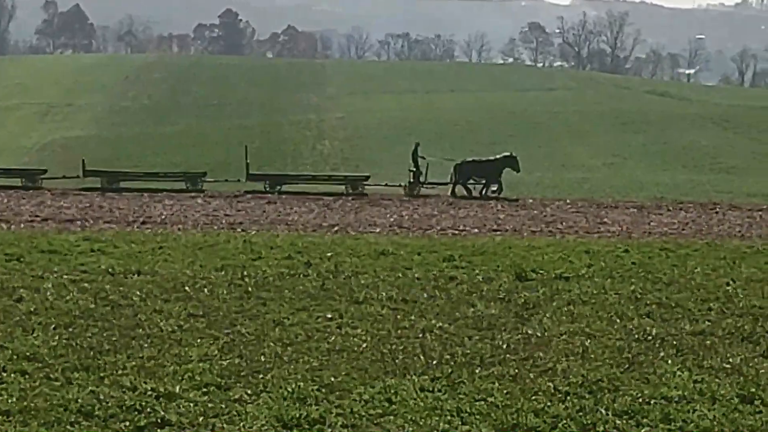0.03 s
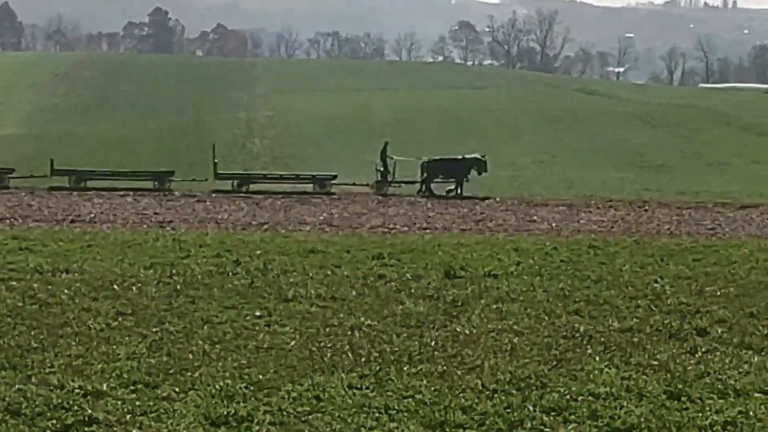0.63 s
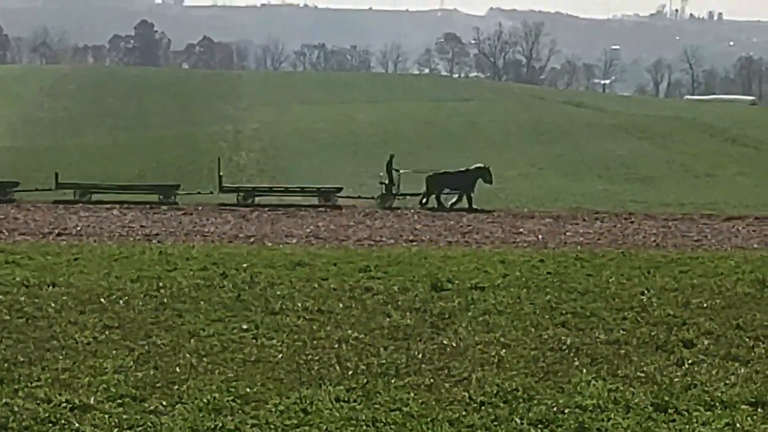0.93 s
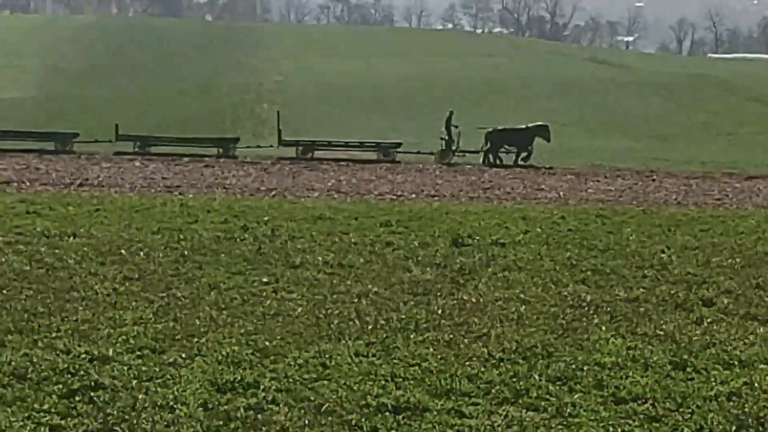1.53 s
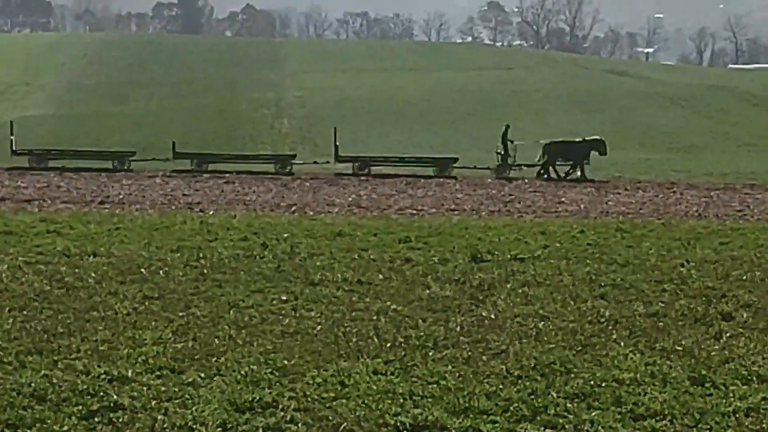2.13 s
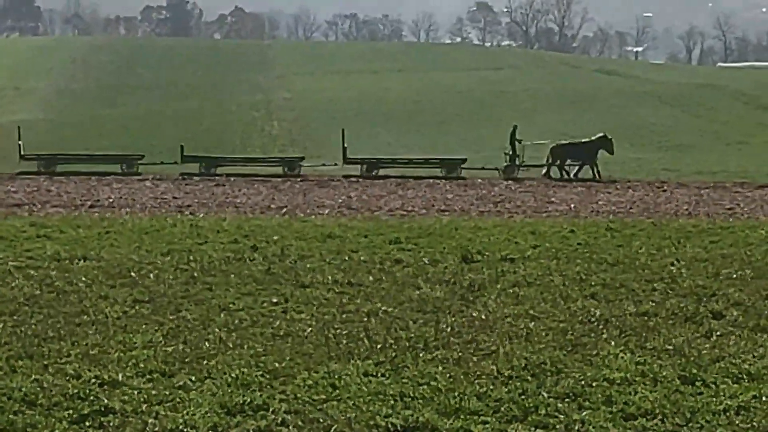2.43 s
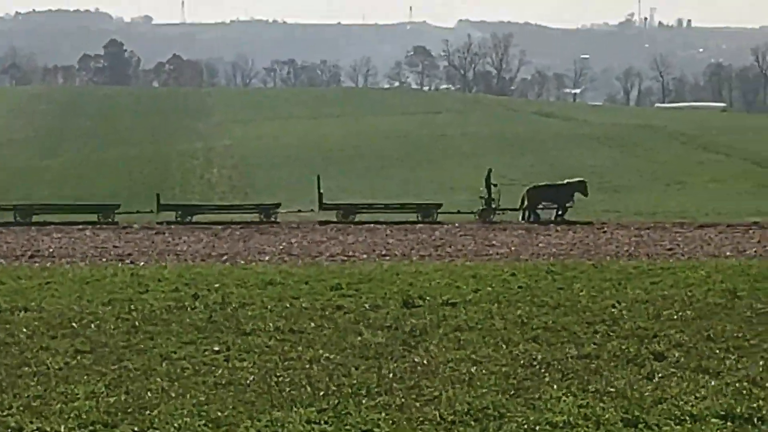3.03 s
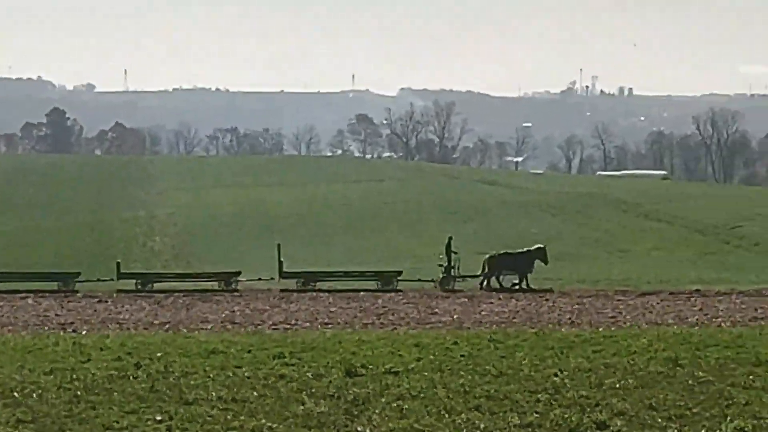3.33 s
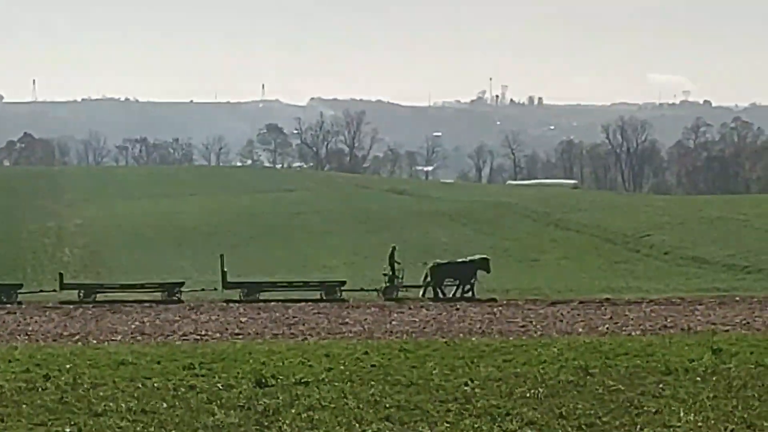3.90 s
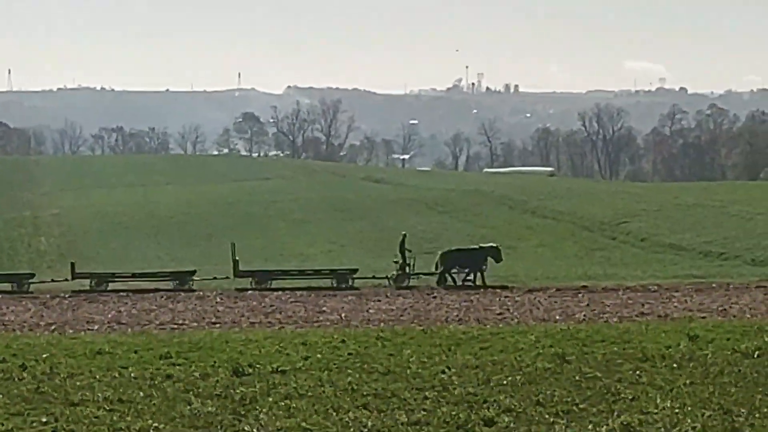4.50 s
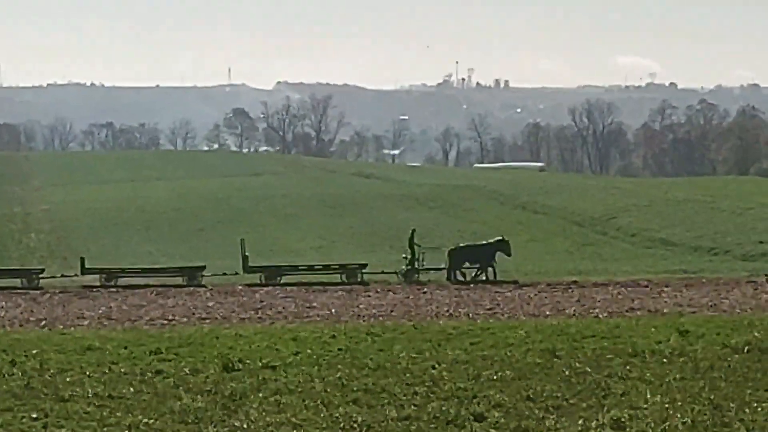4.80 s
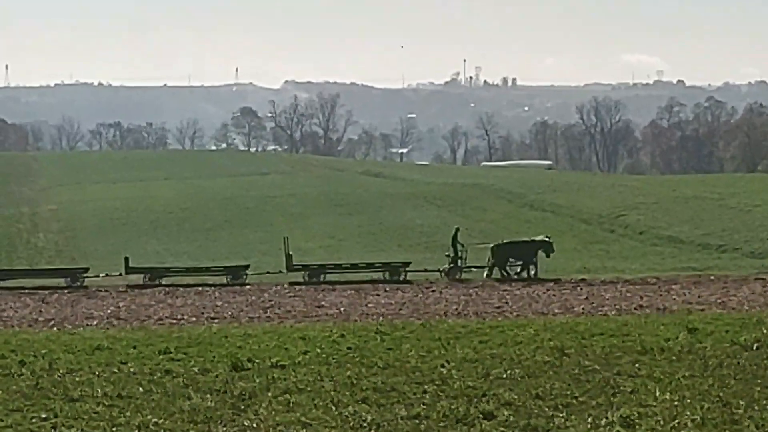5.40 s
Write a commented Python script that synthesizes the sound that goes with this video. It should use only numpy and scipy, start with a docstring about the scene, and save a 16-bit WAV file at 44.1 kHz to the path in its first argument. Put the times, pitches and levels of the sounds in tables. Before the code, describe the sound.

Empty flat wagons roll over dirt some way off in an open field. Their low, hollow rumble and the clatter of loose boards run for the whole five and a half seconds, swelling slightly at ruts around 1.9, 2.7, 3.8 and 5.3 seconds. Hitches and chains click and jingle irregularly above it, more sparsely after 3 seconds. Wheels grind and crunch softly in dry soil, most from 1.4 to 3.1 seconds, then fade away. Tiny stone snaps and short bursts of fine, close rustling dot the first three seconds, and a rim scrapes briefly at the start and near 1.3, 1.7 and 2.1 seconds. Wind buffets the microphone with low thumps in the first half second, mostly on the left, then on the right at 1 and 3.3 seconds. Faint, thin, falling bird whistles come between 3.5 and 5.1 seconds over a quiet outdoor hush.

```python
"""An open field: horses draw a train of empty flat wagons along a dirt strip some way off.
Ruts shake the wagons, so their beds rumble and loose boards clatter. The wheels grind through dry soil
until the ground softens; stones snap, hitches and chains rattle, and a rim scrapes now and then.
Small birds whistle far off. Close by, a fine, dry rustle comes in short bursts,
and a light breeze puffs at the two microphone openings."""
import sys
import numpy as np
from scipy import signal
from scipy.fft import rfft, irfft
from scipy.io import wavfile
from scipy.ndimage import uniform_filter1d

SR = 44100
rng = np.random.default_rng(int(sys.argv[2]) if len(sys.argv) > 2 else 0)


def master(y):
    """Save y as 16-bit WAV."""
    cut = np.clip(np.atleast_2d(y).T, -1, 1)
    pcm = np.round(cut * 32767)  # scale
    wavfile.write(sys.argv[1], SR, pcm.astype(np.int16))


N = 244755
TIME, FREQS = np.arange(N) / SR, np.fft.rfftfreq(N, 1 / SR)
LEFT, RIGHT = 0, 1

# wheels in soil that softens after three seconds: t/s, grinding/dB, crunch/dB
SOIL_LEVELS = [(0, -55.5, -66), (.28, -57.5, -65), (.37, -64.5, -74.5), (.8, -65.5, -63.5),
               (.98, -67.5, -69.5), (1.2, -64.5, -60), (1.38, -56.5, -60), (2.0, -56.5, -65),
               (2.2, -55, -62), (2.48, -55, -64), (2.93, -52, -61), (3.13, -55.5, -68.5),
               (3.26, -65, -71.5), (3.65, -68, -74.5), (5.55, -73, -78)]
# the tone of a grinding rim: f/Hz, level/dB
GRIND_SPECTRUM = [(600, -40.5), (900, -22.5), (1150, -3.5), (1300, 3.5), (1520, 3), (1690, -5), (1830, 3),
                  (2000, 3), (2170, 2), (2430, -3.5), (2700, -5), (2920, -6), (3200, -13.5), (5000, -29.5)]


def wagons(frame_hz=342, boards_follow=0.45, boards_heave=0.65):
    """Ruts shake the wheels and axles, make beds and frames boom, and knock the loose boards."""
    # how hard the track shakes the wagons: t/s, axle rumble/dB, bed boom/dB
    shaking = [(0, -41, -50), (.7, -43, -46.5), (1.25, -49.5, -46.5), (1.8, -50.5, -46), (2.02, -52, -50.5),
               (2.2, -49, -44), (2.55, -47.5, -42.5), (3.4, -45.5, -40.5), (3.67, -48, -44.5),
               (3.9, -46, -40), (4.55, -49, -42), (4.95, -44, -42), (5.55, -45.5, -47.5)]
    # ringing that shifts as they pass: t/s, bed/Hz, plank/Hz, frames over boards/dB, boards/dB
    ringing = [(0, 292.6, 526, -7, -54.5), (1.2, 283, 517, -6, -54.5), (2.2, 268.6, 519, -5, -56.5),
               (3.1, 261, 545, -5, -55.5), (3.8, 244, 583, -0.5, -53.5), (5.55, 246.4, 590, 6, -53.5)]
    # ruts that heave the whole train: t/s, boost/dB
    ruts = [(1.35, 1), (1.68, 3), (1.869, 5), (2.65, 3.5), (3.83, 3), (5.32, 2.5)]
    # the tones of axles, jolts and boards: f/Hz, level/dB
    rumble_spectrum = [(20, -34.5), (40, -26), (60, -13), (90, -3), (125, 2), (152, 1), (180, -5),
                       (215, -9.5), (300, -6.5), (390, -18), (460, -19.5), (800, -69)]
    jolt_spectrum = [(80, -34), (200, -0.5), (680, -5.5), (800, -15.5), (1100, -46.5)]
    board_spectrum = [(200, -23.5), (330, 2.5), (400, 6), (470, 1.5), (540, -0.5), (620, -3), (700, -30.5),
                      (790, -36), (1000, -37.5), (2000, -48.5)]
    rumble_db, boom_db = follow(shaking)
    bed_hz, plank_hz, frame_db, boards_db = follow(ringing)
    heave_db = sum(db * np.exp(-((TIME - s) / 0.055) ** 2) for s, db in ruts)
    clatter_db = boards_db + boards_follow * (boom_db - boom_db.mean()) + boards_heave * heave_db
    rumble = in_stereo(grains(per_s=150, spread_db=2.3, share=0.34), rumble_spectrum)
    bumps = patchy(grains(per_s=250, spread_db=3, share=0.38), depth_db=2.5, size=4096)
    jolts = in_stereo(bumps, jolt_spectrum)
    boom = resonate(jolts, bed_hz, width_hz=82)
    frames = gain_of(frame_db) * resonate(jolts, frame_hz, width_hz=54)
    planks = gain_of(-3) * resonate(jolts, plank_hz, width_hz=167)
    knocks = patchy(grains(per_s=450, spread_db=0, share=0.64), depth_db=4.5, size=4096)
    boards = glide(in_stereo(knocks, board_spectrum), rise_per_s=0.03)
    body = gain_of(rumble_db + 2) * rumble + gain_of(boom_db - 1) * boom
    return gain_of(heave_db) * body + gain_of(clatter_db) * (boards + planks + frames)


def wheels_and_rustle(rustle_db=-69.5, rustle_follow=1.25, clump_db=1.08, crackle_db=1.4):
    """Rims grind and crunch dry soil; a fine, dry rustle close to the microphone comes in short bursts."""
    # short bursts of crunch and rustle: peak t/s, rise/s, crunch/dB, rustle/dB
    bursts = [(.05, 0.037, -59, -73), (.175, 0.024, -65, -66), (.355, 0.087, -65, -68),
              (.545, 0.025, -62, -69), (.69, 0.057, -58.5, -72), (.77, 0.039, -83, -67),
              (.95, 0.058, -98, -69), (1.24, 0.14, -74, -68.5), (1.47, 0.043, -59.5, -68),
              (1.53, 0.064, -79, -66), (1.623, 0.024, -54, -79), (1.847, 0.044, -57.5, -67),
              (2.06, 0.033, -57.5, -80), (2.245, 0.033, -56, -67), (2.37, 0.056, -54.5, -79),
              (2.475, 0.044, -62, -68)]
    # the tones of the crunching grit and the close rustle: f/Hz, level/dB
    grit_spectrum = [(1500, -1), (3000, 5), (3600, 2), (4200, 3), (4800, -3.5), (5500, 0), (6400, -4.5),
                     (7100, -5.5), (8600, -5), (10000, -18.5), (12000, -20), (16000, -45)]
    rustle_spectrum = [(4000, -19.5), (8000, -0.5), (10000, 1.5), (12000, -3), (14000, -7), (16000, -10)]
    grind_db, crunch_db = follow(SOIL_LEVELS)
    bite_db = grind_db + 0.71 * (crunch_db - grind_db)  # the rustle's level mostly follows the crunch
    crunch_gain = gain_of(crunch_db)
    rustle_gain = gain_of(rustle_db + rustle_follow * (bite_db - bite_db.max()))
    for s, rise_s, burst_crunch_db, burst_rustle_db in bursts:
        burst = swell(s, rise_s)
        crunch_gain = np.hypot(crunch_gain, gain_of(burst_crunch_db) * burst)
        rustle_gain = np.hypot(rustle_gain, gain_of(burst_rustle_db) * burst)
    coarse = patchy(grains(per_s=1500, spread_db=2, share=0.34), depth_db=2, size=1024)
    medium = patchy(grains(per_s=1500, spread_db=0, share=0.54), depth_db=3)
    fine = patchy(grains(per_s=1700, spread_db=5, share=0.4), depth_db=3.5, size=256)
    grind = gain_of(grind_db) * in_stereo(colour(coarse), GRIND_SPECTRUM)
    grit = crunch_gain * in_stereo(colour(medium), grit_spectrum)
    rustle = rustle_gain * in_stereo(colour(fine), rustle_spectrum)
    rustle *= gain_of(crackle_db * wander(hz=120))
    return (grind + grit + rustle) * gain_of(clump_db * wander(hz=59.6))


def hitches(rise_s=0.0012, pivot_hz=2400, knock_db=-5, knock_s=0.006):
    """Each jerk of a hitch starts with a knock and sets off a short, dying shower of iron clicks."""
    # jerks of the hitches: t/s, level/dB, time to fade by 60 dB/s, treble tilt/dB per octave
    jerks = [(0.016, -52.5, 0.53, -5.5), (0.254, -53.5, 0.45, -5), (.404, -56, 0.97, 4),
             (.55, -58.5, 1, 4.5), (.7, -56, 0.17, -2), (.789, -52.5, 0.58, 5.5), (1.02, -58.5, 0.65, 3.5),
             (1.114, -56.5, 0.15, 4), (1.612, -48.5, 0.37, 3.5), (1.849, -52.5, 0.34, -1),
             (2.113, -54.5, 0.18, 7), (2.168, -55, 0.26, -1), (2.214, -51, 0.25, 1.5),
             (2.337, -52, 0.21, -9), (2.637, -56, 0.14, -3), (2.666, -51.5, 0.21, 0),
             (2.828, -54, 0.088, 7), (2.996, -55, 0.066, -11), (3.113, -60, 0.15, 5),
             (3.349, -63, 0.18, -1), (3.679, -59.5, 0.26, -1), (3.902, -56, 0.25, 4),
             (3.935, -60.5, 0.62, -5.5), (4.16, -65.5, .15, 5), (4.32, -70, 0.83, 7),
             (4.482, -57.5, 0.69, 0), (4.564, -66.5, 0.6, 2.5), (5.05, -59, 0.2, -2.5),
             (5.198, -65, 0.44, 8.5), (5.252, -69, 0.13, 8.5), (5.33, -65.5, 0.13, 3),
             (5.456, -62.5, 0.31, 0.5)]
    # the tone of a hitch: f/Hz, level/dB
    hitch_spectrum = [(700, -16), (1400, -1.5), (1900, -0.5), (2250, 7), (2780, 3), (3080, -11.5),
                      (3600, -4), (4300, -8.5), (6300, -17), (8500, -23.5), (11000, -38.5), (16000, -52)]
    clicks = patchy(grains(per_s=1400, spread_db=9, share=0.2), depth_db=3)
    shower = in_stereo(colour(clicks), hitch_spectrum)
    out = np.zeros((2, N))
    for s, db, t60, tilt_db in jerks:
        burst = shower[:, round(s * SR):][:, :SR // 2]
        t = TIME[:burst.shape[1]]
        octaves = np.log2(np.maximum(np.fft.rfftfreq(len(t), 1 / SR) / pivot_hz, 0.5))
        burst = evened(irfft(rfft(burst) * gain_of(tilt_db * octaves), len(t)))
        fade = decay(t, t60) + gain_of(knock_db) * np.exp(-t / knock_s)
        add(out, s, gain_of(db - 1) * burst * (1 - np.exp(-t / rise_s)) * fade)
    return out


def chains(rise_s=0.002, jingle_count=70, jingle_hz=(3800, 9600), jingle_t60=0.2):
    """A struck link rings with a thin tone and chatters on its neighbour; high links chatter fastest."""
    # single links and harness rings: t/s, f/Hz, level/dB, time to fade by 60 dB/s
    links = [(.02, 2250, -52, .3), (.41, 4110, -66, .3), (.425, 4450, -66, .3), (.46, 2830, -62, .25),
             (.565, 4150, -66, .4), (.575, 6930, -62.5, .15), (.6, 2820, -61, .25), (.68, 6950, -66, .3),
             (.705, 4250, -63, .2), (1.053, 2820, -56, .16), (1.06, 1160, -67.5, .22),
             (1.12, 2650, -61, .3), (1.125, 4950, -69, .25), (1.16, 4440, -65, .25),
             (1.44, 6970, -61.5, .25), (1.472, 2630, -56, .2), (1.613, 2630, -51, .25),
             (1.635, 2790, -56, .17), (1.64, 8790, -65, .2), (1.762, 2020, -54, .16),
             (1.765, 9560, -72, .2), (1.845, 4130, -63, .2), (2.052, 7020, -60.5, .13),
             (2.116, 4870, -63, .14), (2.116, 2580, -56, .16), (2.12, 1880, -54, .22),
             (2.166, 2580, -56, .15), (2.175, 7190, -65, .18), (2.215, 2620, -52, .18),
             (2.22, 1765, -54, .18), (2.245, 4950, -64, .18), (2.39, 8820, -58.5, .18),
             (2.633, 2070, -53, .17), (2.833, 1510, -52, .15), (3.12, 8810, -74, .17),
             (3.683, 2120, -59, .25), (3.905, 2200, -62, .45), (3.96, 8810, -75, .13),
             (3.98, 2120, -63, .35), (4.483, 2230, -56.5, .38), (4.53, 2350, -64, .4),
             (4.565, 1850, -61, .27), (4.61, 2250, -66, .35), (5.053, 2100, -63, .25),
             (5.462, 2400, -64, .2)]
    t, out = TIME[:SR // 3], np.zeros((2, N))
    crunch_db = follow(SOIL_LEVELS)[1]
    jingles = []  # small links jingle at random, louder on rough ground
    for when, pitch in rng.random((jingle_count, 2)):
        hz = np.interp(pitch, [0, 1], jingle_hz)
        jingles.append((when * N / SR, hz, crunch_db[int(when * N)] - 10.5, jingle_t60))
    for s, hz, db, t60 in links + jingles:
        tone = np.sin(2 * np.pi * hz * t + rng.random((2, 1)))
        chatter = resonate(rng.standard_normal((2, len(t))), hz, width_hz=110 + 0.025 * hz)
        ring = tone + np.sqrt(0.5) * chatter  # both equally strong
        add(out, s, gain_of(db) * ring * (1 - np.exp(-t / rise_s)) * decay(t, t60))
    return out


def rims(edge_s=0.038, waver=0.025):
    """A rim rubs on its frame: tiny slips make it ring, and the pitch wavers as the contact shifts."""
    # scrapes of an iron rim: start t/s, length/s, f/Hz, level/dB
    scrapes = [(.01, 0.39, 2240, -58.5), (1.25, 0.28, 2260, -60), (1.69, 0.26, 2190, -58.5),
               (2.09, 0.22, 1750, -60)]
    slips = in_stereo(grains(per_s=830, spread_db=1.5, share=0.54), GRIND_SPECTRUM)
    unsteady = 1 + waver * wander(hz=15)
    out = np.zeros((2, N))
    for s, length, hz, db in scrapes:
        rub = slips[:, round(s * SR):][:, :round(length * SR)]
        t = TIME[:rub.shape[1]]
        ring = resonate(rub, hz * np.interp(s + t, TIME, unsteady), width_hz=330)
        fade = np.clip(np.minimum(t, length - t) / edge_s, 0, 1)
        add(out, s, gain_of(db) * ring * fade)
    return out


def stones(tick_t60=0.014, crumbs_db=-13, crumbs_t60=0.09):
    """A stone cracks with one bright tick, and its crumbs scatter."""
    # small stones snapping under a rim: t/s, level/dB
    snaps = [(.17, -58), (.344, -62), (.548, -63), (.802, -58), (.96, -60), (1.364, -59), (1.844, -56),
             (2.253, -58), (2.398, -59), (2.837, -61)]
    # the tone of a snap: f/Hz, level/dB
    stone_spectrum = [(1500, -12), (4000, -1), (9000, 0), (14000, -3), (16000, -9)]
    t, out = TIME[:SR // 10], np.zeros((2, N))
    splinters = in_stereo(grains(per_s=2200, spread_db=1, share=0.6), stone_spectrum)
    fade = decay(t, tick_t60) + gain_of(crumbs_db) * decay(t, crumbs_t60)
    for s, db in snaps:
        add(out, s, gain_of(db) * fade * splinters[:, round(s * SR):][:, :len(t)])
    return out


def birds(settle=2.2, quaver=0.007, echo_db=-11, echo_t60=0.25):
    """Thin, quavering whistles slide down to their last pitch; the field scatters a faint echo."""
    # bird notes: t/s, length/s, start f/Hz, end f/Hz, peak/dB, left minus right/dB
    notes = [(3.525, .058, 9600, 7550, -65.5, -8), (3.575, .06, 8000, 7600, -74, -4),
             (4.545, .065, 8700, 7250, -75, -6), (4.545, .065, 8100, 6850, -76, -6),
             (4.652, .022, 7400, 7350, -74, -2), (4.757, .018, 5750, 5650, -74, -2),
             (4.818, .027, 4900, 4000, -70, -4), (4.953, .055, 4680, 4500, -67, -1),
             (5.108, .03, 5360, 5280, -68.5, 0)]
    out = np.zeros((2, N))
    unsteady = 1 + quaver * wander(hz=300)
    for s, length, start_hz, end_hz, db, pan_db in notes:
        progress = np.linspace(0, 1, round(length * SR))
        hz = end_hz + (start_hz - end_hz) * (1 - progress) ** settle
        hz *= unsteady[round(s * SR):][:len(hz)]
        note = np.sin(np.pi * progress) * np.sin(2 * np.pi * np.cumsum(hz) / SR)
        add(out, s, gain_of(db + np.array([[0.5], [-0.5]]) * pan_db) * note)
    out[LEFT] = np.roll(out[LEFT], 3)  # the calls reach the left side a moment late
    tail = rng.standard_normal((2, SR // 3)) * decay(TIME[:SR // 3], echo_t60)
    echo = signal.fftconvolve(out, tail / np.linalg.norm(tail[LEFT]), axes=1)[:, :N]
    return out + gain_of(echo_db) * echo


def wind(lumps_db=-1, core_db=-12, core_ratio=1.53):
    """Lumpy air buffets each microphone opening separately; single swirls with tight cores thump."""
    # the strength of the breeze: t/s, left/dB, right/dB
    breeze = [(0, -36, -51), (.15, -43, -57), (.3, -36, -56), (.45, -40.5, -51), (.55, -44.5, -63),
              (1.05, -51.5, -42), (1.3, -68, -57.5), (3, -56, -66.5), (5.55, -61, -54)]
    # the tone of the buffeting: f/Hz, level/dB
    buffet_spectrum = [(15, -30.5), (50, 0.5), (100, 4.5), (180, -1.5), (350, -9.5), (800, -34),
                       (2000, -90)]
    # swirls striking one opening: t/s, level/dB, f/Hz, side
    puffs = [(.092, -25, 89, LEFT), (.184, -24, 127, LEFT), (.198, -14.5, 110, LEFT),
             (.228, -26, 170, LEFT), (.263, -19, 135, RIGHT), (.27, -23, 145, RIGHT), (.33, -26, 115, LEFT),
             (.404, -27, 85, LEFT), (.426, -19.5, 90, LEFT), (.444, -16, 235, LEFT), (.478, -23, 228, LEFT),
             (.999, -21.5, 102, RIGHT), (1.014, -29, 80, LEFT), (3.256, -13, 156, RIGHT)]
    noise = rng.standard_normal((2, N))
    out = evened(irfft(rfft(noise) * gain_of(across_pitch(buffet_spectrum)), N))
    lumps = np.array([wander(hz=4.2), wander(hz=8.1)])
    out *= gain_of(np.array(follow(breeze)) + lumps_db * lumps)
    for s, db, hz, side in puffs:
        out[round(side)] += gain_of(db) * (swirl(s, hz) + gain_of(core_db) * swirl(s, hz * core_ratio))
    return out


def swirl(s, hz):
    """The pressure of a passing swirl of air: a peak between two dips."""
    spread = (np.pi * hz * (TIME - s)) ** 2
    return (1 - 2 * spread) * np.exp(-np.minimum(spread, 100))


def air(level_db=-66):
    """The steady hush of open country."""
    # the tone of the hush: f/Hz, level/dB
    hush_spectrum = [(30, -12.5), (400, 10), (900, 7), (1500, 3.5), (3000, -8.5), (6000, -29), (10000, -48),
                     (16000, -41)]
    return gain_of(level_db) * in_stereo(rng.standard_normal((2, N)), hush_spectrum)


def colour(x):
    """Adds narrow peaks and dips to the tone; the high treble turns hollow and comb-like."""
    # peaks and dips in the tone: f/Hz, width/Hz, boost/dB
    bands = [(1505, 110, 3), (2155, 74, 4), (2440, 110, -4.5), (2603, 40, 7), (2830, 45, 6.5),
             (2962, 40, 3), (3690, 170, -5), (4430, 70, 2.5), (4950, 50, 4), (6980, 110, 4), (7570, 540, 4),
             (8810, 30, 6), (9600, 350, 3.5), (10600, 600, -2.5), (11440, 400, 3.5), (12400, 300, 3.5),
             (12950, 400, -4), (13500, 250, 4)]
    boost_db = sum(db / (1 + (2 * (FREQS - hz) / width) ** 2) for hz, width, db in bands)
    return irfft(rfft(x) * gain_of(boost_db), N)


def in_stereo(streams, spectrum):
    """Turns two unrelated streams into one stereo source with the given tone, at strength 1."""
    # how alike the two sides sound: f/Hz, likeness/0 to 1
    likeness = [(60, .99), (200, .99), (400, .95), (700, .92), (950, .5), (1400, .75), (2100, .72),
                (2700, .35), (4200, .45), (8000, .25), (15000, .05)]
    # how far the left side runs ahead: f/Hz, phase/radians
    lead = [(0, 0), (150, -.13), (350, -.42), (700, -.95), (1000, -1.9), (1400, -4), (1800, -6.1),
            (2250, -7), (4000, -6.8), (8000, -7)]
    # which side is louder: f/Hz, left minus right/dB
    balance = [(200, 0), (380, -.6), (700, -1.3), (1290, 3.5), (2380, 1.5), (4400, -.3), (8120, -1.2),
               (15000, -2)]
    left, other = rfft(streams)
    same = np.clip(across_pitch(likeness), 0, 1)
    delay = np.exp(-1j * np.interp(FREQS, *np.transpose(lead)))
    right = (same * left + np.sqrt(1 - same ** 2) * other) * delay
    lean = gain_of(across_pitch(balance) / 2)
    return evened(irfft(np.array([left * lean, right / lean]) * gain_of(across_pitch(spectrum)), N))


def grains(per_s, spread_db, share):
    """Two streams of tiny impacts, holding this share of the power, over a blur of smaller ones."""
    sizes = gain_of(spread_db * np.minimum(rng.exponential(1, (2, N)), 4))
    signs = rng.choice([-1, 1], (2, N))
    impacts = evened(sizes * signs * (rng.random((2, N)) < per_s / SR))
    return np.sqrt(share) * impacts + np.sqrt(1 - share) * rng.standard_normal((2, N))


def patchy(x, depth_db, size=512):
    """The tone drifts in random patches; a larger size makes them narrower and longer-lasting."""
    slices = signal.stft(x, nperseg=size)[2]
    patches = uniform_filter1d(rng.standard_normal(slices.shape[1:]), size=3, axis=0)
    patches = evened(uniform_filter1d(patches, size=5, axis=1))
    return signal.istft(slices * gain_of(depth_db * patches))[1][:, :N]


def resonate(x, hz, width_hz):
    """Makes a sound ring around a steady or moving pitch, at strength 1."""
    turn = np.exp(2j * np.pi * np.cumsum(hz * np.ones(x.shape[-1])) / SR)
    hold = np.exp(-np.pi * width_hz / SR)
    return evened((turn * signal.lfilter([1], [1, -2 * hold, hold * hold], x / turn)).real)


def glide(x, rise_per_s):
    """Plays a sound gradually faster, so its pitch climbs by this share each second."""
    position = np.cumsum(1 + rise_per_s * (TIME - TIME.mean()))
    return np.array([np.interp(position, np.arange(N), channel, period=N) for channel in x])


def wander(hz):
    """A smooth random curve of strength 1 that moves up to about hz times a second."""
    return evened(irfft(rfft(rng.standard_normal(N)) / (1 + (FREQS / hz) ** 4), N))


def swell(s, rise_s):
    """A loudness curve that swells to 1 at time s and trails off."""
    age = np.maximum(1 + (TIME - s) / rise_s, 0)
    return (age * np.exp(1 - np.minimum(age, 20))) ** 2


def decay(t, t60):
    """A fade that falls by 60 dB in t60 seconds."""
    return np.exp(-np.log(1000) * t / t60)


def gain_of(db):
    """Turns decibels into a volume factor."""
    return 10 ** (np.asarray(db) / 20)


def evened(x):
    """Scales a signal to an average strength (rms) of 1."""
    return x / np.sqrt(np.mean(x ** 2) + 1e-20)


def across_pitch(points):
    """Joins (Hz, value) points into a curve over all frequencies, spaced by octaves."""
    hz, value = np.transpose(points)
    return np.interp(np.log(FREQS + 1), np.log(hz + 1), value)


def follow(rows):
    """Joins timed rows into one curve per column, sample by sample."""
    times, *columns = np.transpose(rows)
    return [np.interp(TIME, times, column) for column in columns]


def add(mix, s, sound):
    """Mixes a sound in at s seconds."""
    part = mix[..., round(s * SR):][..., :sound.shape[-1]]
    part += sound[..., :part.shape[-1]]


def scene():
    """The wagon train, the close rustle, the birds and the weather."""
    return (wagons() + wheels_and_rustle() + stones() + hitches() + chains()
            + birds() + wind() + air() + rims())


def record(dry, edge_hz=15750):
    """Cuts off the very highest treble."""
    lowpass = signal.firwin(511, edge_hz, window=("kaiser", 9), fs=SR)
    return signal.oaconvolve(dry, lowpass[None], "same")


dry = scene()
out = record(dry)
master(out)
```